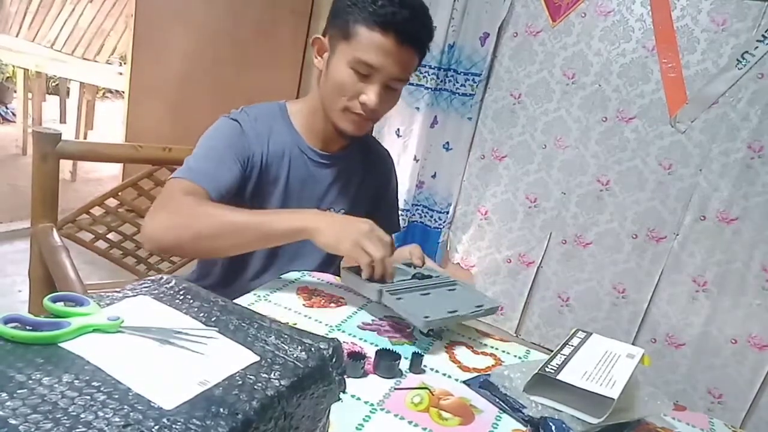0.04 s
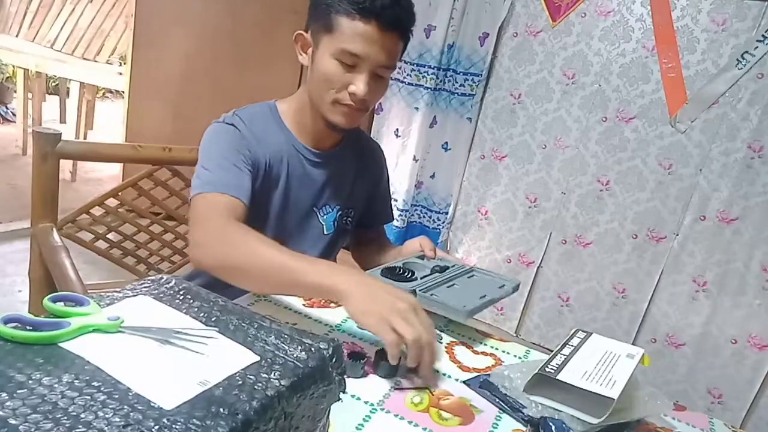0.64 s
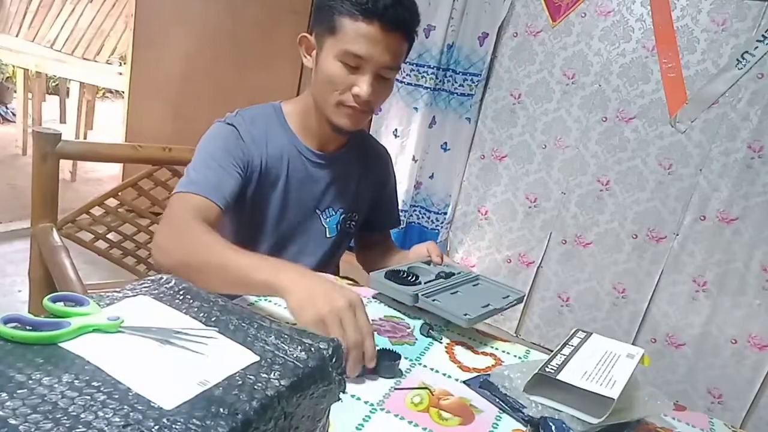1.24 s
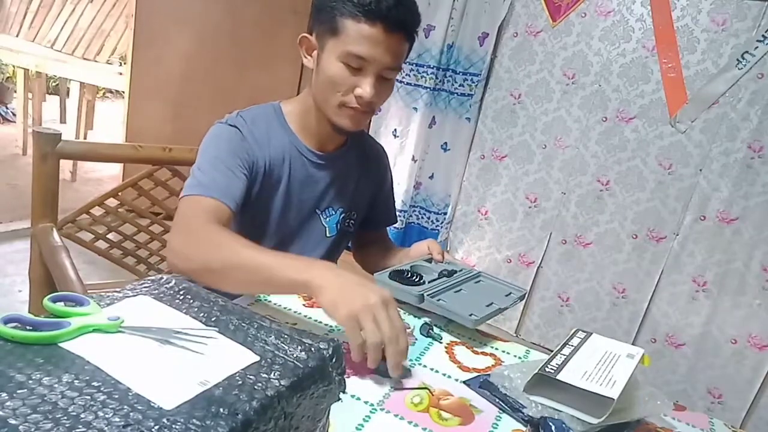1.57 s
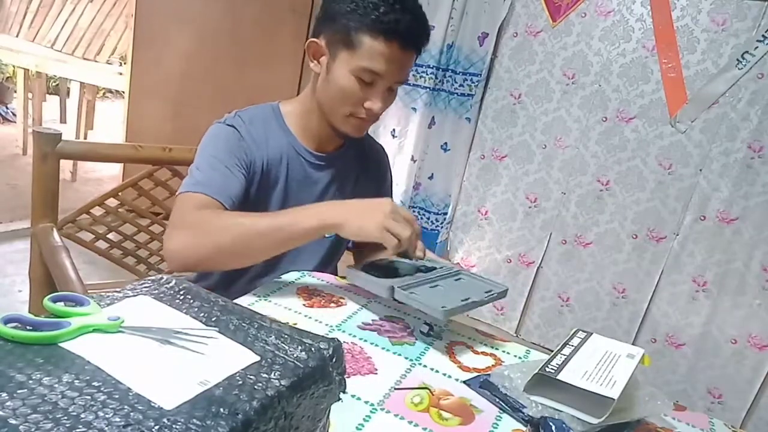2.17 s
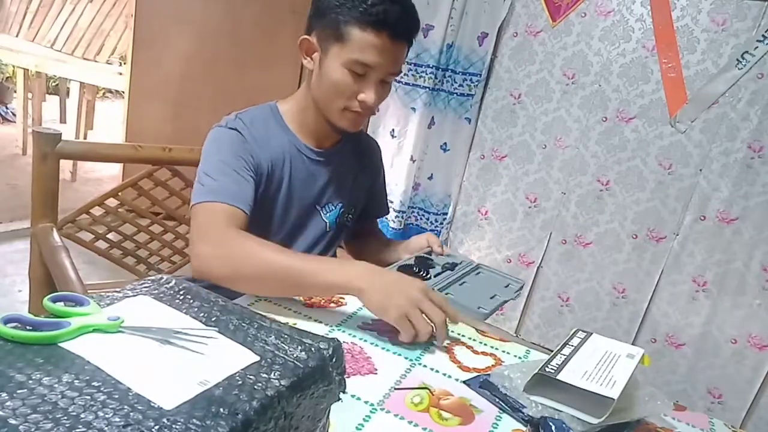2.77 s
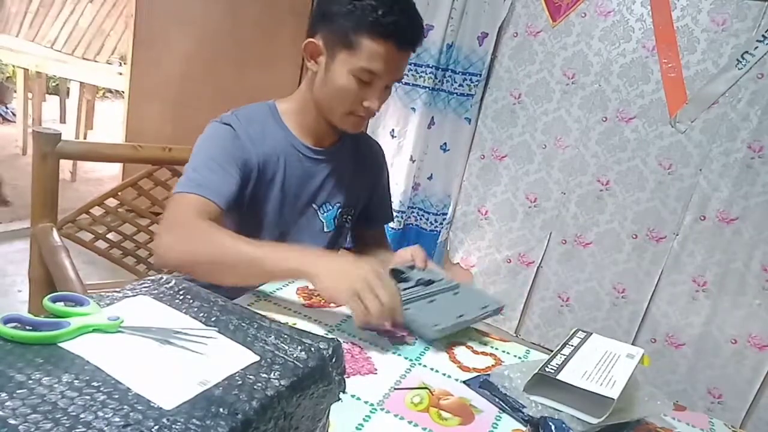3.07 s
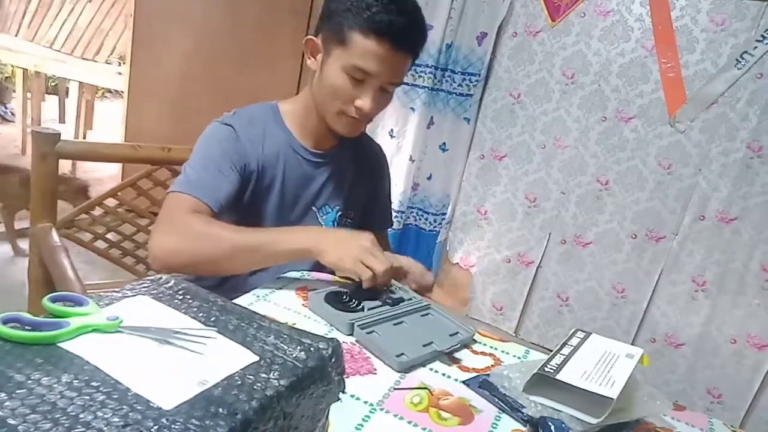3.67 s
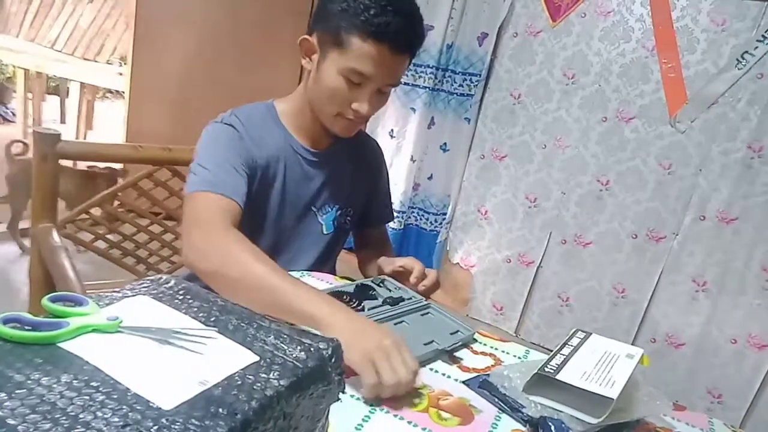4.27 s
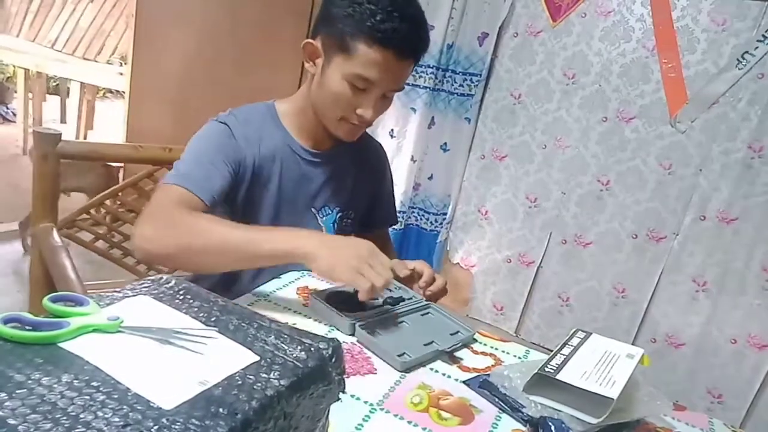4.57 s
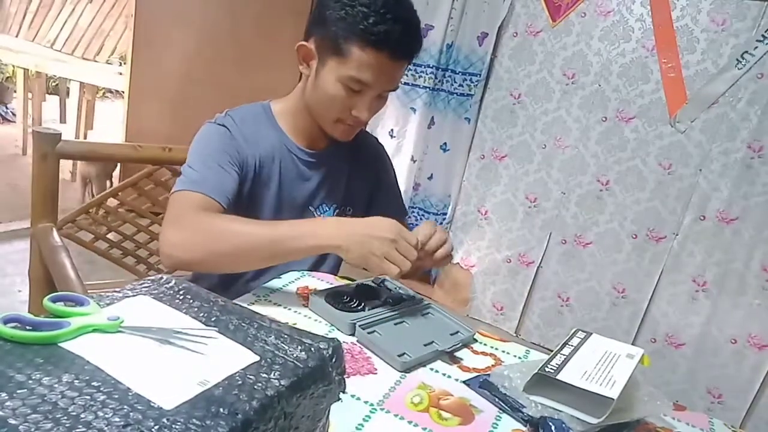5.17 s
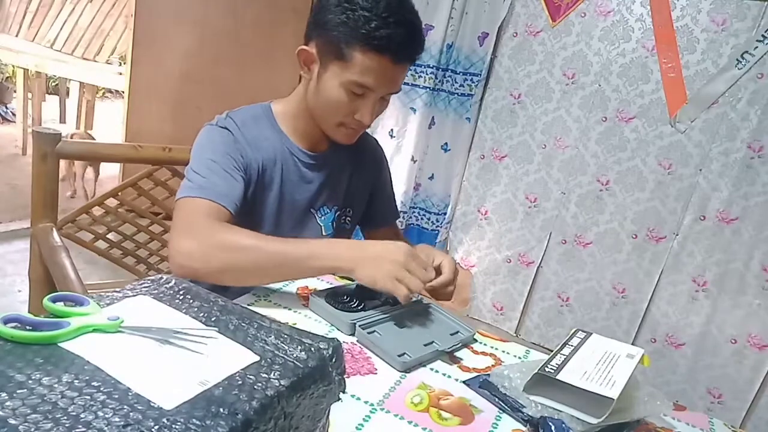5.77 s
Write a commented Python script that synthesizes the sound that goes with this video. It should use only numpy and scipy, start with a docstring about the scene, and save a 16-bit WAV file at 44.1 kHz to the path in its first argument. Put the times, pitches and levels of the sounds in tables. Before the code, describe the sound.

Close by in a small room with a short echo, cup-shaped steel saws click, clink and clack against a hollow plastic case and a table. Some ring for an instant before being stopped by the hand. The knocks come in irregular clusters, mixed with soft brushing, then thin out to a lull and one last small click. A faint cricket and a low hush continue underneath.

```python
"""In a small, echoing room, steel hole saws are picked off a table and pushed into a plastic case.
Each knock thuds in the table, sounds the hollow case, clacks on its walls and ticks on the steel.
The cup-shaped saws ring until the fingers damp them; held parts clink, hands brush and bump the case.
Behind it all, a cricket pulses faintly over the room's low hush."""
import sys
import numpy as np
from scipy import signal
from scipy.fft import rfft, irfft
from scipy.io import wavfile

SR = 44100
rng = np.random.default_rng(int(sys.argv[2]) if len(sys.argv) > 2 else 0)


def persist_wave(psi):
    """Save psi, clipped to +-1, as 16-bit WAV."""
    counts = np.round(np.clip(psi, -1, 1) * 32767).astype(np.int16)
    wavfile.write(sys.argv[1], SR, np.atleast_2d(counts).T)


N = 261072
TIME = np.arange(N) / SR
AGE = TIME[:SR * 2 // 5]   # seconds since a sound began

# tone of the background air: f/Hz, relative level/dB
HUSH_TONE = [(18, -60.5), (30, -37.5), (48, -22), (65, -12.5), (92, -14.5), (142, -0.5), (180, -9.5),
             (233, -5.5), (265, -7.5), (302, -9), (926, -22), (988, -19.5), (1430, -25), (1590, -24.5),
             (5200, -33.5), (6760, -67.5), (11400, -120)]
# loudness of that air over time: t/s, level/dB
HUSH_LEVELS = [(0, -65.5), (2.1, -69.5), (3.9, -66.5), (5.92, -68.5)]
# the room's echo: f/Hz, t60/s (the time it takes to fade by 60 dB)
ECHO_TIMES = [(100, 0.17), (300, 0.21), (800, 0.26), (2000, 0.25), (4000, .25), (7500, 0.21)]
# soft brushes and dull bumps: t/s of the peak, swell time/s, level/dB, centre f/Hz
BRUSHES_AND_BUMPS = [(0.443, 0.077, -71, 550), (2.309, 0.016, -48, 900), (2.464, 0.091, -57.5, 1100),
                     (2.615, 0.099, -67.5, 1200), (3.161, 0.03, -62, 2710), (3.3, 0.074, -59.5, 3000),
                     (3.472, .04, -59, 550), (3.719, 0.037, -58.5, 800), (4.259, 0.069, -60.5, 135),
                     (4.554, 0.024, -70.5, 584), (4.965, .022, -71.5, 3685)]
# clinks of parts held in the fingers: t/s, level/dB, f/Hz, t60/s
HELD_CLINKS = [(0.0, -22, 2850, .015), (0.117, -27.5, 2934, .05), (1.188, -25, 3570, 0.03),
               (1.359, -46, 3550, .03), (1.562, -36.5, 2510, .035), (1.578, -17, 2060, .021),
               (3.535, -9, 2135, .006), (5.857, -34, 2300, .026)]
# ringing saw cups: t/s, level/dB, f/Hz, swell time/s, fade time/s, overtone level/dB
CUP_RINGS = [(0.0, -45, 2845, 0.0033, 0.13, -1.5), (.114, -40.5, 2962, .003, 0.15, -12),
             (1.123, -37, 3605, 0.012, 0.11, -29.5), (1.562, -42, 3657, 0.014, 0.1, 1.5),
             (1.625, -42, 3647, 0.0026, 0.16, -19.5), (2.346, -37, 3637, 0.0046, 0.3, -17.5),
             (3.215, -56.5, 3615, 0.0037, 0.21, -15), (3.303, -51.5, 3682, 0.0023, .14, -31.5),
             (3.6, -43, 3670, .005, .11, -17)]
# knocks: t/s, strength/dB, weight/dB, hardness/dB, struck spot's f/Hz, rattle/dB, settling time/s
BLOWS = [(0.0, -44.5, -12.5, 17.5, 623, 1, 0.0092), (0.111, -45, -11, 15, 624, 0, 0.003),
         (0.6984, -46.5, -11, -29, 477, -0.5, 0.006), (.708, -49, -10.5, -26.5, 320, -7, .004),
         (1.125, -55.5, 2, 0.5, 330, 0.5, 0.0094), (1.139, -23.5, 1, -5, 503, -8, 0.0024),
         (1.3587, -83.5, 20, 12.5, 174, 4, 0.013), (1.56, -44.5, 1, 5, 664, 8, .015),
         (1.5763, -26.5, 0, -2, 940, 0, .0046), (2.3062, -38, -10, 8.5, 665, 0.5, 0.034),
         (2.847, -58.5, 7.5, -7, 350, 3, 0.066), (2.9, -54.5, 2, -1, 640, 4, 0.016),
         (2.946, -64, 11.5, -3, 335, -8, 0.015), (3.18, -51, -2, -16, 768, -1, .008),
         (3.191, -44.5, 1, -2.5, 638, 0.5, 0.06), (3.256, -46, 1, -4.5, 452, 10, 0.0073),
         (3.368, -59.5, 8, -4, 433, 4.5, 0.0084), (3.513, -28.5, -7, -0.5, 732, -4.5, 0.036),
         (3.534, -37, 8, 6.5, 144.6, -4, 0.0064), (4.083, -60.5, 24, 0, 120.2, -15.5, .01),
         (4.095, -45.5, -1, -5, 132.6, 1.5, 0.038), (4.146, -53.5, -3, -1, 640, -0.5, 0.017),
         (5.803, -69.5, 2, -5, 1100, 3, 0.0086), (5.854, -53, -40, 9, 1490, 0, 0.0021)]
# the table's deep thud: f/Hz, level/dB, t60/s
THUD_MODES = [(122, -7, .14), (146, -3, .1), (174, 0, .09), (199, 1, .1), (240, -7, .05)]
# the table top: f/Hz, level/dB, t60/s
TOP_MODES = [(293, -7, 0.014), (333.2, 2, 0.1), (395, -2.5, .045), (497.6, -6.5, 0.0053)]
# the hollow of the case: f/Hz, level/dB, t60/s
HOLLOW_MODES = [(464, -8, .05), (497, -2, .06), (546, -3, .05), (583, 0, .05), (662, 1.5, .055),
                (783, -1, .045), (840, 1, .045), (938, 2, .045), (1042, -2, .04)]
# the case's walls: f/Hz, level/dB, t60/s
WALL_MODES = [(1350, 0, 0.025), (1415, -0.5, 0.023), (1550, 3.5, 0.023), (1728, -2, 0.036),
              (1881, -1.5, 0.032), (2037, 0.6, 0.013), (2340, -0.4, 0.027)]
# the steel's tick: f/Hz, level/dB, t60/s
TICK_MODES = [(2450, -4, 0.0037), (2850, -3.5, 0.019), (3100, 0.5, 0.016), (3394, 1, 0.016),
              (3675, 4.5, 0.016), (4160, 7.5, 0.0087), (3940, 2, 0.011)]
# the steel's bright edge: f/Hz, level/dB, t60/s
EDGE_MODES = [(4510, 4.5, 0.0065), (5250, 5.5, 0.0031), (5950, 6, .004), (6293, -2.5, 0.0069),
              (6750, -3.5, 0.014), (6600, -6, 0.0031)]


def from_db(db):
    """Turn decibels into a gain."""
    return np.exp(np.asarray(db) * np.log(10) / 20)


def rms_one(x):
    """Scale a sound to an average (rms) level of 1."""
    return x / np.sqrt(np.mean(x ** 2) + 1e-20)


def at_hz(points, hz):
    """Read between a table's rows on a log-frequency axis."""
    freqs, values = np.transpose(points)
    return np.interp(np.log(hz + 1), np.log(freqs), values)


def band(x, low_hz, high_hz, order=2):
    """Keep what lies between two frequencies."""
    return signal.sosfilt(signal.butter(order, [low_hz, high_hz], "band", fs=SR, output="sos"), x)


def add(track, s, sound):
    """Mix a sound in at s seconds."""
    i = max(0, round(s * SR))
    track[i:i + len(sound)] += sound[:N - i]


def through(x, response):
    """Let x shake an object, given that object's response to one tap."""
    return signal.fftconvolve(x, response)[:len(x)]


def mode(hz, t60):
    """A mode is one fading note of a struck object."""
    age = AGE[:SR // 7]
    return np.sin(2 * np.pi * hz * age) * from_db(-60 * age / t60)


def room(x, t60, echo_db, build_s=0.0017):
    """The direct sound plus its reflections, which build up after each touch and then die away."""
    decay = ((1 - np.exp(-(AGE / build_s) ** 2)) * from_db(-60 * AGE / t60)) ** 2
    energy = np.abs(through(x ** 2, decay / decay.sum()))
    return x + from_db(echo_db) * np.sqrt(energy) * rng.standard_normal(len(x))


def hush():
    """Background air: mostly low noise that drifts gently in level."""
    tone = from_db(at_hz(HUSH_TONE, np.fft.rfftfreq(N, 1 / SR)))
    air = rms_one(irfft(rfft(rng.standard_normal(N)) * tone, N))
    return from_db(np.interp(TIME, *np.transpose(HUSH_LEVELS))) * air


def cricket(level_db=-78.5, chirps_per_s=9.13, first_s=.078):
    """Each chirp is a swelling rasp near 6 kHz; distance fills the gaps with a faint wash."""
    lag = np.interp(TIME, (1.5, 2.05), [0, .62])   # the cricket slows once and falls behind
    count = 1 + chirps_per_s * (TIME - first_s) - lag
    swell = np.abs(np.cos(np.pi * count)) ** 3.2 + .19
    chirp_db = level_db + rng.normal(0, .9, 64)[np.round(count).astype(int)]
    rasp = rms_one(band(rng.standard_normal(N), 5850, 6720, order=4))
    return from_db(chirp_db) * swell * rasp


def brushes_and_bumps(width_ratio=2.52):
    """Soft brushes and dull bumps as the hands shift the case, each a short swell of noise."""
    out = np.zeros(N)
    for s, swell_s, db, hz in BRUSHES_AND_BUMPS:
        noise = rms_one(band(rng.standard_normal(len(AGE)), hz / width_ratio, hz * width_ratio))
        swell = np.exp(-(AGE / swell_s - 2) ** 2)
        add(out, s - 2 * swell_s, from_db(db) * noise * swell)
    return out


def clinks():
    """A gripped part sounds one very short note, which the room carries on."""
    out = np.zeros(N)
    for s, db, hz, t60 in HELD_CLINKS:
        tap = room(1.0 * (AGE == 0), at_hz(ECHO_TIMES, hz), echo_db=-1.0)
        add(out, s, from_db(db) * through(tap, mode(hz, t60)))
    return out


def saw_rings(grip=2.2, overtone_ratio=1.707, waver_db=1.2, overtone_waver_db=3.0, blur_db=-21):
    """A cup flexes into an oval, ringing with one overtone and fading ever faster as fingers close."""
    power, pitch = np.zeros((2, N)), np.zeros(N)   # power rows: main note, overtone
    for s, db, hz, swell_s, fade_s, overtone_db in CUP_RINGS:
        fade = (1 - np.exp(-AGE / swell_s)) * from_db(db - 60 * (AGE / fade_s) ** grip)
        add(power[0], s, fade ** 2)
        add(power[1], s, (fade * from_db(overtone_db)) ** 2)
        pitch[TIME >= s] = hz
    phase = 2 * np.pi * np.cumsum(pitch) / SR
    # the ring wavers in level and phase, like close notes beating in an echoing room
    wander = rms_one(band(rng.standard_normal((2, N)), 12, 60))
    waver = from_db(np.array([[waver_db], [overtone_waver_db]]) * wander)
    blur = from_db(blur_db) * rms_one(band(rng.standard_normal((2, N)), 10, 120))
    tones = np.sin(np.array([phase, overtone_ratio * phase]) + blur)
    return np.sum(np.sqrt(2 * power) * waver * tones, axis=0)


def contact(rattle_db, settle_s, bounces_per_s=900, ease_s=0.0017):
    """A firm touch, then small uneven bounces; a piece that rattles a lot has a weaker first click."""
    envelope = (1 - np.exp(-AGE / ease_s)) * np.exp(-AGE / settle_s)
    hits = rng.random(len(AGE)) < bounces_per_s / SR
    bounces = hits * rng.standard_normal(len(AGE)) * envelope
    touch = from_db(-2 * max(rattle_db, 0)) * (AGE == 0)
    return touch + from_db(rattle_db) * bounces / (np.linalg.norm(bounces) + 1e-9)


def cushion(x, corner_hz=6000):
    """Fingers and the tablecloth take the sharp edge off a knock."""
    return signal.sosfilt(signal.butter(2, corner_hz, fs=SR, output="sos"), x)


def nearness(hz, target_hz, octaves):
    """1 when two notes match, falling towards 0 as they move apart."""
    return np.exp(-(np.log2(hz / target_hz) / octaves) ** 2)


def body(modes, low_hz, high_hz, boost_hz, boost_db, scatter_db=2.0):
    """A struck part rings on all its modes, lifted near boost_hz and a little different each time."""
    out = 0
    for hz, db, t60 in modes:
        lift_db = boost_db * nearness(hz, boost_hz, octaves=.2)
        out = out + from_db(db + lift_db + rng.normal(0, scatter_db)) * mode(hz, t60)
    return band(out, low_hz, high_hz, order=3)


def knocks(echo_db=3.7, spot_db=7, tick_hz=3000):
    """Each blow shakes table, case and steel: weight feeds the table, hardness the walls and steel."""
    out = np.zeros(N)
    for s, strength_db, weight_db, hard_db, spot_hz, rattle_db, settle_s in BLOWS:
        force = contact(rattle_db, settle_s)
        room_db = echo_db + .35 * min(hard_db, 0)   # soft touches get less echo
        # level/dB, share of weight, share of hardness, centre f/Hz, ring
        parts = [(-6.5, 1, 0, 170, body(THUD_MODES, 90, 270, spot_hz, boost_db=15)),
                 (-2, .25, 0, 340, body(TOP_MODES, 220, 390, spot_hz, boost_db=7.5)),
                 (0, 0, 0, 700, body(HOLLOW_MODES, 420, 1200, spot_hz, boost_db=11.5)),
                 (-4.5, 0, .29, 1700, body(WALL_MODES, 920, 2600, spot_hz, boost_db=4.5)),
                 (-5, 0, .9, 3300, body(TICK_MODES, 2450, 4000, tick_hz, boost_db=.5)),
                 (-13, 0, 1, 6000, body(EDGE_MODES, 4300, 7900, tick_hz, boost_db=0))]
        for part_db, by_weight, by_hardness, centre_hz, ring in parts:
            db = strength_db + part_db + by_weight * weight_db + by_hardness * hard_db
            # parts near the struck spot's note speak louder
            db += spot_db * nearness(centre_hz, spot_hz, octaves=.6)
            echoing_force = room(force, at_hz(ECHO_TIMES, centre_hz), room_db)
            sound = through(echoing_force, cushion(ring))
            add(out, s, from_db(db) * sound / np.std(sound[:SR // 25]))   # first 40 ms set the level
    return out


def scene(low_cut_hz=98):
    """Handling close by, cricket and hush behind; the knocks and clinks carry almost no deep bass."""
    low_cut = signal.butter(5, low_cut_hz, "high", fs=SR, output="sos")
    blows = signal.sosfilt(low_cut, knocks() + clinks())
    return (blows + saw_rings() + brushes_and_bumps() + cricket() + hush())[None]


def record(dry, roll_off_hz=7150, cutoff_hz=7750):
    """A narrow-band microphone: the highest treble rolls off, then is cut."""
    soft = signal.sosfilt(signal.butter(16, roll_off_hz, fs=SR, output="sos"), dry)
    return signal.sosfilt(signal.ellip(10, .3, 70, cutoff_hz, fs=SR, output="sos"), soft)


dry = scene()
out = record(dry)
persist_wave(out)
```